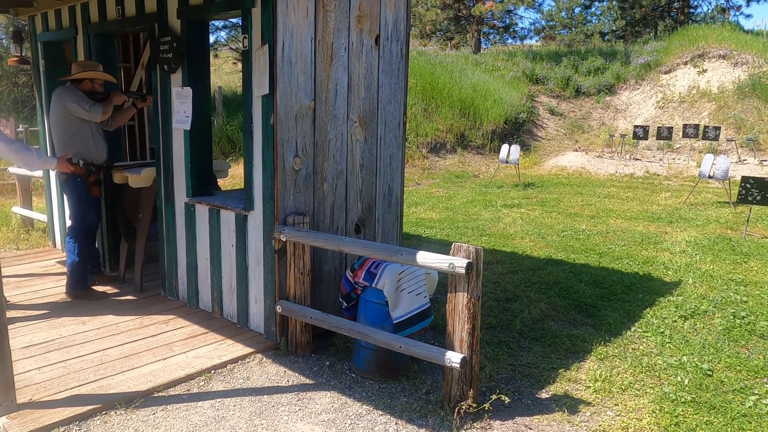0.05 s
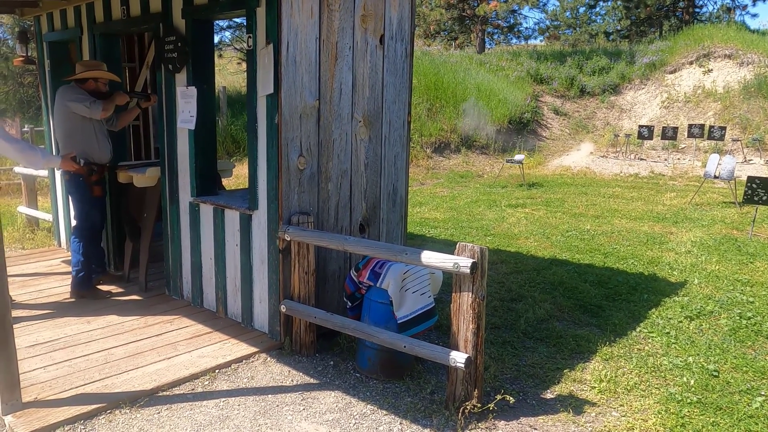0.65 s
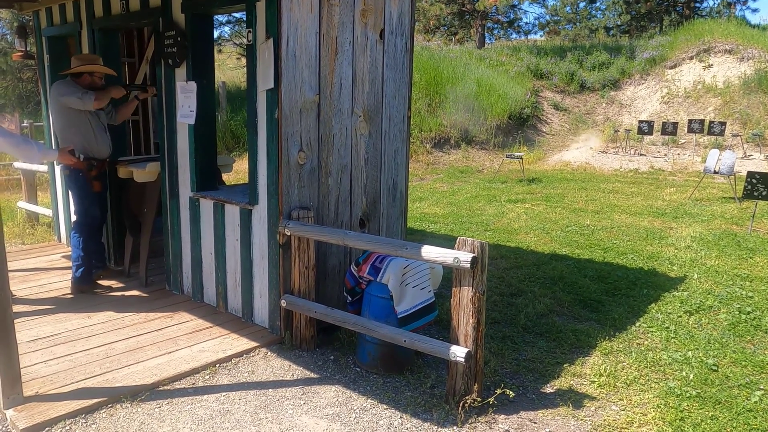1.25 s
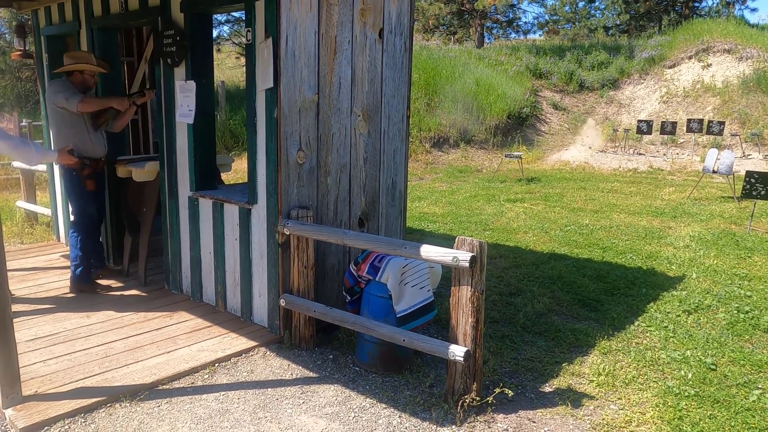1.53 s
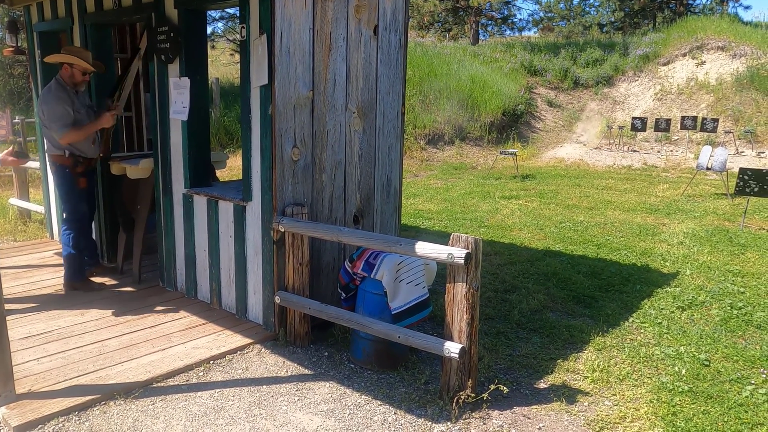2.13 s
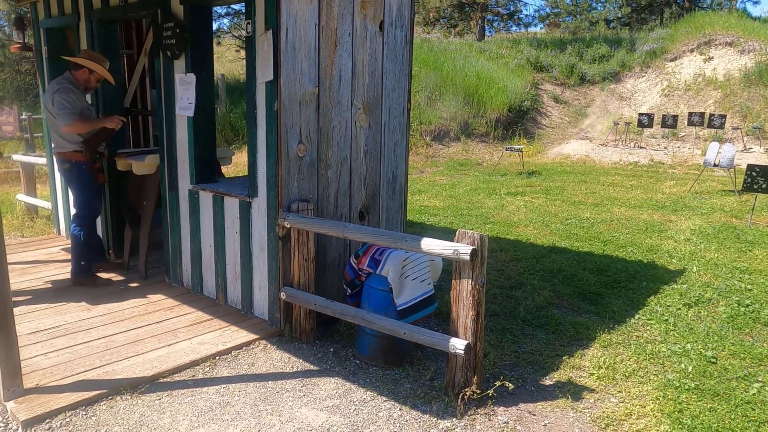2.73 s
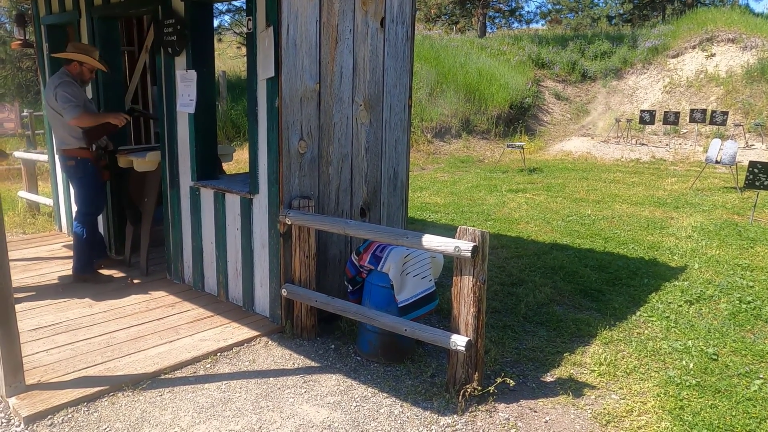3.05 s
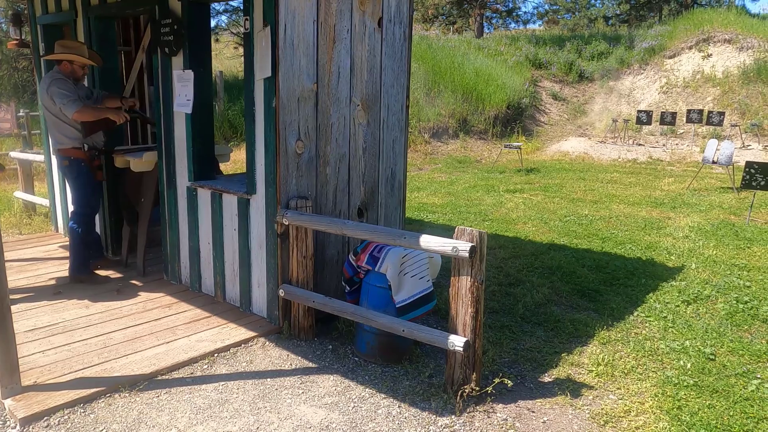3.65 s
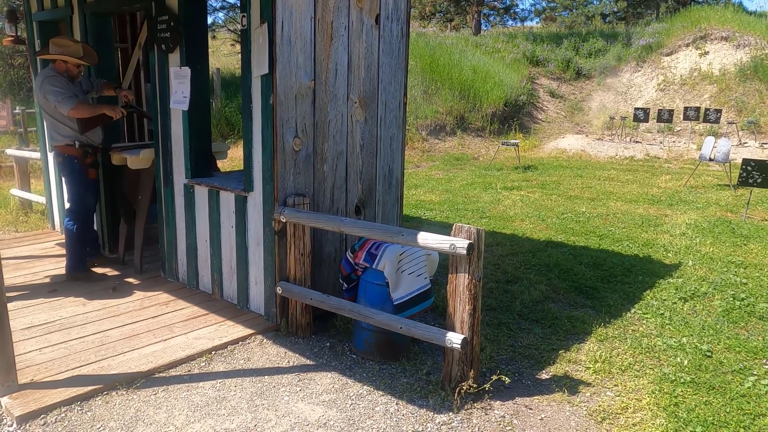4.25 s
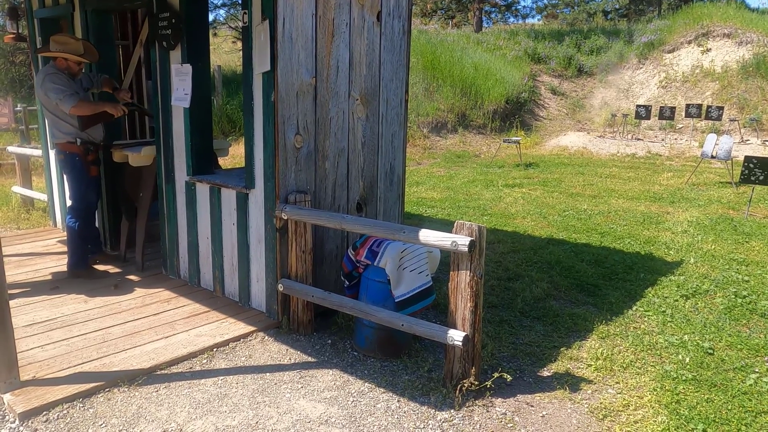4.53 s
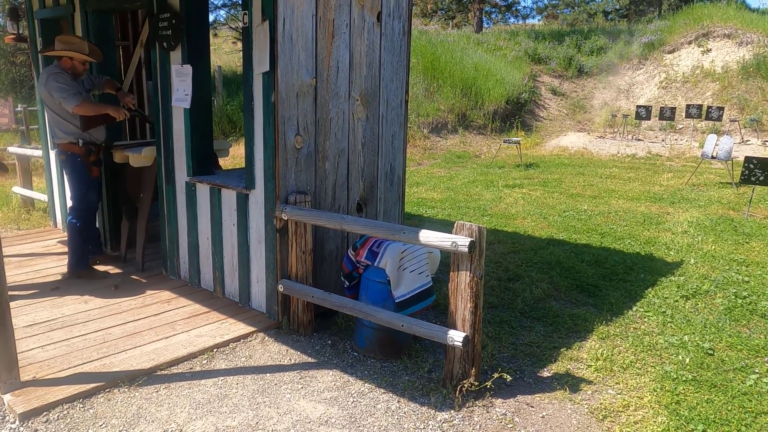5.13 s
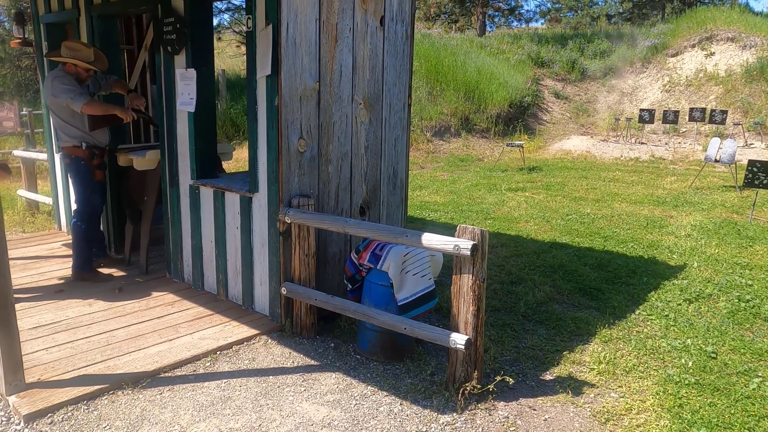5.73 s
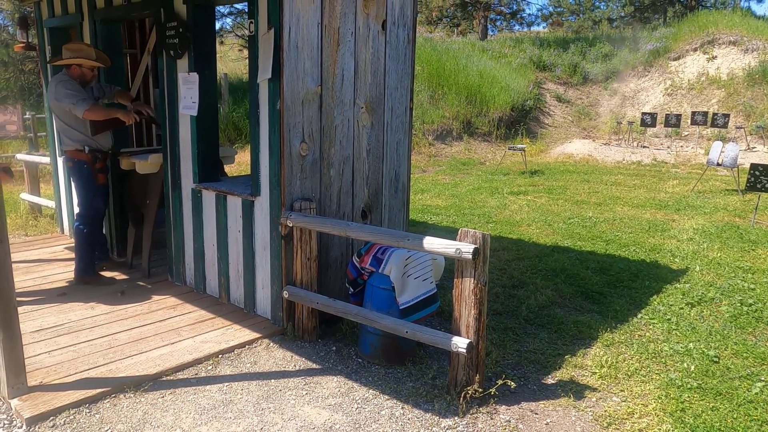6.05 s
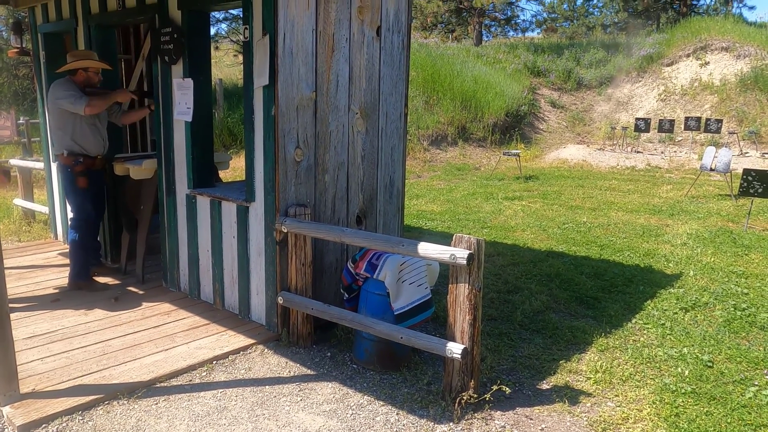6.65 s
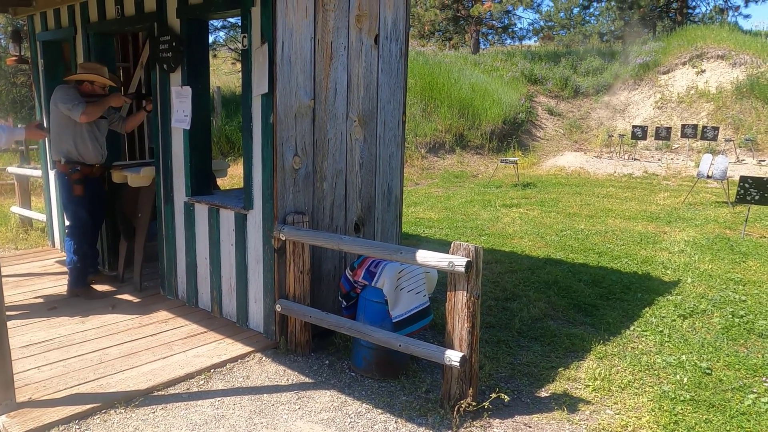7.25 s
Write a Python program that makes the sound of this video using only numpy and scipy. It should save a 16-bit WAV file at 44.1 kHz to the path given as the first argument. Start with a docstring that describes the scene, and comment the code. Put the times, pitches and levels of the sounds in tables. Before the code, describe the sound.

A shotgun fires twice from a wooden booth with a rolling echo, followed by steel clicks and wooden knocks of gun handling.

```python
"""A moment of faint hiss, then two shotgun blasts, close to the microphone in a wooden range booth.
The muzzle cracks, the booth booms, walls and the earth bank answer, and the report rolls away over
the field. The first charge slaps a steel plate, which jangles as it topples. A little to the left the
shooter works the action, lays the gun on a table and handles the next one: steel and wood knock and
slide. A bird twitters far off. The blasts overload the stereo recorder."""
import sys
import numpy as np
from scipy import signal
from scipy.fft import rfft, irfft, next_fast_len
from scipy.io import wavfile

SR = 44100
rng = np.random.default_rng(int(sys.argv[2]) if len(sys.argv) > 2 else 0)


def to_wav(s):
    """Save 16-bit WAV."""
    ch = np.atleast_2d(s).T  # columns
    pcm = np.round(np.clip(ch, -1, 1) * 32767)  # PCM
    wavfile.write(sys.argv[1], SR, pcm.astype(np.int16))


N = 321467

# the two shots: start_s, blast_db, tail_db, swell_db, swell_held_s, swell_t60_s
SHOTS = [(0.3439, 4, -0.5, -11, .013, .065), (1.3925, 2.5, -2.5, -14.5, 0.0049, 0.045)]
# contact noise of gun steel, wooden stock and table top: frequency_hz, level_db
STEEL_COLOUR = [(700, -35), (1800, -2.5), (2500, 0.5), (3300, -2.5), (4400, 3), (5500, -4.5), (6900, -3),
                (8500, -14.5), (12000, -21.5), (14500, -49)]
STOCK_COLOUR = [(250, -27), (420, -17.5), (580, -2.5), (900, -6), (1300, 2.5), (1700, -6.5), (2200, -6),
                (3200, -20.5), (7000, -54)]
TABLE_COLOUR = [(40, -24.5), (110, 5.5), (190, -1.5), (290, 2), (450, -3.5), (600, -6.5), (1000, -20),
                (3000, -49)]
# modes of the table top: pitch_hz, level_db, t60_s
TABLE_MODES = [(144.5, -12, 0.49), (286.8, -14, 0.42), (642, 0, 0.094)]


def amp(db):
    """Decibels to gain."""
    return 10 ** (np.asarray(db) / 20)


def unit(x):
    """Scales to rms 1."""
    return x / np.sqrt(np.mean(x ** 2) + 1e-20)


def curve(points, hz):
    """Joins (frequency_hz, value) points on a log-frequency axis."""
    corners_hz, values = np.transpose(points)
    return np.interp(np.log(hz + 1), np.log(corners_hz + 1), values)


def add(mix, start_s, sound):
    """Mixes in a stereo sound, or a mono one at the centre."""
    sound = np.atleast_2d(sound)
    part = mix[:, max(round(start_s * SR), 0):][:, :sound.shape[1]]
    part += sound[:, :part.shape[1]]


def clock(size):
    """Sample times in seconds."""
    return np.arange(size) / SR


def attack(t, rise_s):
    """Exponential rise from 0 toward 1."""
    return 1 - np.exp(-t / rise_s)


def fade(t, t60_s):
    """Exponential decay that loses 60 dB in t60_s."""
    return np.exp(-np.log(1000) * t / t60_s)


def noise(colour, size):
    """Stereo noise of rms 1 in the given colour, nearly mono in the bass."""
    # stereo width at the microphone: frequency_hz, side_against_mid_db
    width = [(30, -22), (100, -14), (280, -15), (500, -10.5), (2000, -9), (12000, -10.5)]
    padded = next_fast_len(size, True)
    hz = np.fft.rfftfreq(padded, 1 / SR)
    mid, side = np.exp(2j * np.pi * rng.random((2, len(hz)))) * amp(curve(colour, hz))
    side = side * amp(curve(width, hz))
    return unit(irfft([mid + side, mid - side], padded)[:, :size])


def wander(size, rate_hz):
    """Random drift of rms 1 with up to about rate_hz changes a second."""
    padded = next_fast_len(size, True)
    hz = np.fft.rfftfreq(padded, 1 / SR)
    slow = rfft(rng.standard_normal(padded)) / (1 + (hz / rate_hz) ** 4) * (hz > 0)
    return unit(irfft(slow, padded)[:size])


def ring(modes, t):
    """Damped sines of a struck body."""
    return sum(amp(db) * fade(t, t60_s) * np.sin(2 * np.pi * hz * t) for hz, db, t60_s in modes)


def background_gain(rest_db=-47, dip_db=13, deepest_after_s=0.52):
    """The background sinks after each blast and creeps back."""
    ages = [np.maximum(clock(N) - start_s, 0) / deepest_after_s for start_s, *_ in SHOTS]
    return amp(rest_db - dip_db * sum(age * np.exp(1 - age) for age in ages))


def background(drone_hz=27, buzz_hz=5400):
    """Outdoor air and high hiss, a deep wavering drone, and a thin haze of far birds and insects."""
    # open air on the range: frequency_hz, level_db
    air_colour = [(15, 2), (45, 0), (80, -13), (128, -13), (152, 2), (240, -9.5), (450, -16.5),
                  (850, -21.5), (1300, -19.5), (3300, -35), (6500, -32), (9300, -18), (11200, -26),
                  (12000, -47.5)]
    air = noise(air_colour, N)
    drone_phase = 2 * np.pi * drone_hz * clock(N) + 0.41 * wander(N, 2.6)
    drone = unit(np.sin(drone_phase) * amp(wander(N, 5)))
    buzz_colour = [(buzz_hz * .8, -50), (buzz_hz * .94, -3), (buzz_hz * 1.04, 0), (buzz_hz * 1.3, -50)]
    buzz = noise(buzz_colour, N) * amp(-21 + 3 * wander(N, 9.2))
    return (air + amp(3) * drone + buzz) * background_gain()


def bird(run_s=.14, step_s=0.028, glide=0.0094, detune=0.0152):
    """A distant bird hops between two pitches in quick runs; it sinks and rises with the background."""
    # the runs: start_s
    twitters = [.16, 2.92, 4.17, 4.77, 5.08, 5.33, 5.56, 6.27, 7.08]
    # the two notes: pitch_hz
    pitches = [5520, 5120]
    out, t = np.zeros((2, N)), clock(1200)
    fall = 1 + glide * (.5 - t / t[-1])
    for start_s in twitters:
        for k, note_s in enumerate(np.arange(start_s, start_s + run_s, step_s)):
            hz = pitches[k % 2] * (1 + detune * rng.standard_normal()) * fall
            note = np.sin(2 * np.pi * np.cumsum(hz) / SR) * np.hanning(len(t))
            add(out, note_s, rng.uniform(0.4, 1.8) * note)
    return out * amp(-16) * background_gain()


def contact(colour, modes, t60_s, booth_db, uneven_db=2.8):
    """One contact: a sharp tick, a burst of dense vibration, a few modes and the booth's reverberation."""
    t = clock(12000)
    spectrum = rfft(noise(colour, len(t)))
    # the place of contact favours some groups of modes and misses others
    ripple = wander(spectrum.shape[1], 0.0033 * SR * SR / len(t))
    vibration = unit(irfft(spectrum * amp(uneven_db * ripple)))
    tick, burst, booth = fade(t, 0.0049), fade(t, t60_s), amp(booth_db) * fade(t, 0.43)
    return vibration * (tick + burst + booth) * attack(t, 0.00087) + ring(modes, t)


def thuds():
    """Planks boom under a weight: a gun on the table or a boot on the boards."""
    # weights coming down: start_s, level_db
    landings = [(1.9102, -43.5), (2.305, -45.5), (2.346, -46), (2.6862, -23.5), (3.1047, -32.5),
                (3.193, -34.5), (3.5683, -38.5), (4.3541, -38), (6.25, -41.5)]
    plank_modes = [*TABLE_MODES, (335, 3, 0.071)]
    out = np.zeros((2, N))
    for start_s, db in landings:
        add(out, start_s, amp(db - 3) * contact(TABLE_COLOUR, plank_modes, t60_s=0.15, booth_db=-20))
    return out


def strokes(chatter_db=2, chatter_hz=180, sag_db=-8):
    """Sliding parts chatter against each other and weaken toward the end of their travel."""
    # slides of the action and of a gun on wood: start_s, length_s, steel_db, wood_db
    slides = [(0.558, 0.15, -34.5, -39), (0.71, 0.03, -32.5, -35), (0.939, 0.051, -36.5, -38.5),
              (1.005, 0.14, -43, -49.5), (1.347, .015, -44.5, -39.5), (1.735, 0.012, -40, -33),
              (2.159, 0.053, -55, -52.5), (4.338, 0.24, -56, -49.5), (6.623, 0.12, -49, -48),
              (6.676, 0.0098, -41, -25), (6.705, 0.059, -25, -19)]
    out, t = np.zeros((2, N)), clock(16384)
    for start_s, length_s, steel_db, wood_db in slides:
        sag = amp(sag_db * np.minimum(t / length_s, 1))
        stop = fade(np.maximum(t - length_s, 0), 0.079)
        parts = (steel_db, STEEL_COLOUR), (wood_db, STOCK_COLOUR), (wood_db - 20, TABLE_COLOUR)
        friction = sum(amp(db) * noise(colour, len(t)) for db, colour in parts)
        chatter = amp(chatter_db * wander(len(t), chatter_hz))
        add(out, start_s, friction * chatter * attack(t, 0.0067) * sag * stop)
    return out


def knocks(rebound_s=0.02, rebound_db=-17.5):
    """Each knock sounds the steel, the stock and the table; the part that is hit rings at its own pitch."""
    # knocks and clicks of the guns in the hands: start_s, steel_db, wood_db, pitch_hz
    hits = [(0.945, -26.5, -43, 4040), (1.912, -26, -34, 2225), (2.0852, -42, -66, 3860),
            (2.6616, -16, -19.5, 1080), (2.6852, -23.5, -13.5, 1323), (2.7983, -36, -67, 4350),
            (3.0012, -45, -74, 5560), (3.105, -44, -32, 1360), (3.195, -16, -23.5, 4330),
            (3.264, -33.5, -44, 4330), (3.2849, -65, -35.5, 926), (3.359, -41, -42, 1420),
            (3.408, -34.5, -32, 1084), (3.5682, -29, -32, 1273), (3.6245, -37, -38.5, 4360),
            (3.8735, -38.5, -38, 1490), (3.889, -31.5, -43, 3310), (3.97, -33, -51, 3210),
            (4.3543, -48, -36, 1000), (4.4003, -37.5, -52, 4390), (5.7309, -31, -39.5, 2050),
            (6.2382, -17, -37, 1477), (6.575, -40.5, -29.5, 1136), (6.6207, -32, -42, 1970),
            (6.7093, -16, -18, 1416), (6.7146, -13.5, -15, 1370), (6.733, -21, -19, 1350)]
    # modes of the gun's steel and of its wooden stock: pitch_hz, level_db, t60_s
    steel_modes = [(2490, -27, 0.29), (3150, -24, 0.15), (3740, -17, 0.11), (4180, -34, 0.049),
                   (5970, -15, 0.022)]
    stock_modes = [(1127, -11.5, 0.15), (1280, -13.5, 0.067), (1820, -42, .07)]
    out, t = np.zeros((2, N)), clock(12000)
    for start_s, steel_db, wood_db, pitch_hz in hits:
        click_db = steel_db - 5
        click = amp(click_db) * contact(STEEL_COLOUR, steel_modes, t60_s=0.04611, booth_db=-25)
        stock = amp(wood_db) * contact(STOCK_COLOUR, stock_modes, t60_s=0.053, booth_db=-23)
        table = amp(wood_db - 23) * contact(TABLE_COLOUR, TABLE_MODES, t60_s=0.106, booth_db=-23)
        struck_part = ring([(pitch_hz, max(click_db, wood_db) - 4, .075)], t)
        add(out, start_s, click + stock + table + struck_part)
        add(out, start_s + rebound_s, amp(rebound_db) * click)  # loose steel ticks again as it settles
    return out


def plate(fall_db_per_s=23, detune=0.013, uneven_db=4, rattle_db=4, rattle_hz=90):
    """Downrange, pellets slap a steel plate; each bump rings it anew and loose contact breaks the ring up."""
    # the first charge on the steel: start_s, level_db, t60_s
    pellets = (.3893, -14.5, .03)
    # bumps of the toppling plate: start_s
    bumps = [0.561, .63, 0.714, 0.948, 1.02]
    # modes of the plate, damped by what it rests on: pitch_hz, level_db, t60_s
    plate_modes = [(545, -5, 0.48), (1060, 0, 0.17), (1750, 2, 0.28), (3040, -5.5, 0.13), (3300, 2, 0.28),
                   (4530, -8.5, 0.26), (4900, 5.5, .2), (5200, -18, 0.219), (5550, -2, 0.27),
                   (7370, -2.5, .28), (7510, -4.5, 0.48)]
    out, t = np.zeros((2, N)), clock(16384)
    slap_s, slap_db, slap_t60_s = pellets
    add(out, slap_s, amp(slap_db) * noise(STEEL_COLOUR, len(t)) * fade(t, slap_t60_s))
    for start_s in bumps:
        bump_db = -42.5 - fall_db_per_s * (start_s - bumps[0])
        modes = [(hz * (1 + detune * rng.standard_normal()), db + uneven_db * rng.standard_normal(), t60_s)
                 for hz, db, t60_s in plate_modes]
        rattle = amp(rattle_db * wander(len(t), rattle_hz))
        add(out, start_s, amp(bump_db) * ring(modes, t) * attack(t, 0.0024) * rattle)
    return out


def field_roll(rise_s=0.018, lumps_db=2, lumps_hz=50):
    """The report comes back in lumps from far grass and trees, each band dying at its own rate."""
    # the rolling tail: frequency_hz, level_db
    roll_colour = [(18, -39), (30, -14), (120, -0.5), (311, -3.5), (495, -15), (827, -16.5), (941, -12),
                   (1310, -18), (1570, -20.5), (1880, -17.5), (2040, -20.5), (6310, -27), (12000, -46.5),
                   (14000, -81)]
    # how long the field holds the report: frequency_hz, t60_s
    field_decay = [(50, 1.31), (220, 0.63), (600, 1.14), (1500, 1.41), (5000, 1.14), (12000, 0.71)]
    t = clock(65536)
    scatter = rfft(noise(roll_colour, len(t)))
    hz = np.fft.rfftfreq(len(t), 1 / SR)
    out = np.zeros((2, len(t)))
    centres_hz, t60s = np.transpose(field_decay)
    for band_weights, t60_s in zip(np.eye(len(field_decay)), t60s):
        band = irfft(scatter * curve(np.c_[centres_hz, band_weights], hz))
        out += band * fade(t, t60_s) * amp(-17 + lumps_db * wander(len(t), lumps_hz))
    return out * attack(t, rise_s)


def wall_echoes(size, edge_hz=1350, floor_db=-20, t60_s=.032):
    """Walls and the earth bank throw back single echoes, all smeared and dulled alike."""
    # the reflections: delay_s, level_db
    echoes = [(.0735, -7.5), (0.0791, -7), (0.102, -16.5), (0.141, -18), (.205, -26.5), (.433, -23.5),
              (.521, -33.5)]
    # an echo before dulling: frequency_hz, level_db
    echo_colour = [(60, -10), (300, -7.5), (600, -3.5), (1000, 4.5), (2000, -7), (6000, 0), (14000, -31)]
    out, t = np.zeros((2, size)), clock(8192)
    dulled = [(hz, db + max(floor_db, -20 * np.log10(1 + (hz / edge_hz) ** 4))) for hz, db in echo_colour]
    envelope = fade(t, t60_s) * attack(t, .001) ** 2
    for delay_s, db in echoes:
        add(out, delay_s, amp(db) * noise(dulled, len(t)) * envelope)
    return out


def swell(level_db, held_s, t60_s, lumps_db=2, lumps_hz=120):
    """A brief dull rush that grows toward a blast and cuts out just ahead of it."""
    # the rush: frequency_hz, level_db
    swell_colour = [(30, -2), (150, 2), (320, -2), (430, -19), (650, -6.5), (950, -0.5), (1300, -14),
                    (2100, -16.5), (4200, -22), (6000, -31), (12000, -51)]
    ahead_s = clock(4096)[::-1]
    envelope = fade(np.maximum(ahead_s - held_s, 0), t60_s) * attack(ahead_s, 0.00042)
    gain = amp(level_db + lumps_db * wander(len(ahead_s), lumps_hz))
    return noise(swell_colour, len(ahead_s)) * envelope * gain


def muzzle_blast(planks_delay_s=0.0076):
    """Close up: the muzzle crack, its scatter off the near planks and the boom of the booth."""
    # the crack: frequency_hz, level_db
    crack_colour = [(30, -4), (130, -9), (300, -9.5), (430, -4.5), (950, 1), (1500, -7.5), (2100, -4.5),
                    (3000, -13.5), (5000, -10.5), (7000, -16.5), (10000, -28.5), (14000, -34.5)]
    # modes of the booth: pitch_hz, level_db, t60_s
    booth_modes = [(61, -21, 0.27), (162, -12, 0.08), (230, -7.5, 0.069), (263, -15.5, 0.03),
                   (312, -10, 0.11), (678, -32, 0.14), (979, -21.5, 0.19)]
    t = clock(16384)
    crack = amp(-6) * noise(crack_colour, len(t)) * fade(t, 0.036)
    scatter = amp(-15) * noise(crack_colour, len(t)) * fade(t, .09)
    add(crack, planks_delay_s, scatter)
    return crack + ring(booth_modes, t) * attack(t, 0.002)


def shotgun():
    """Both shots leave from one spot, so they share one crack and one set of echoes."""
    out, blast, tail = np.zeros((2, N)), muzzle_blast(), field_roll()
    tail += wall_echoes(tail.shape[1])
    for start_s, blast_db, tail_db, swell_db, held_s, t60_s in SHOTS:
        rush = swell(swell_db, held_s, t60_s)
        add(out, start_s - rush.shape[1] / SR, rush)
        add(out, start_s, amp(blast_db) * blast)
        add(out, start_s, amp(tail_db) * tail)
    return out


def scene(pan_db=0.62):
    """The range as heard from the booth, the shooter's hands a little left of the microphone."""
    hands = (knocks() + thuds() + strokes()) * amp([[pan_db], [-pan_db]])
    return shotgun() + plate() + hands + bird() + background()


def record(dry, left_lead_s=8e-6, edge_hz=13900):
    """The two microphone ports differ slightly, the blasts clip, and a low-pass cuts the top treble."""
    # imbalance of the ports: frequency_hz, left_minus_right_db
    port_balance = [(30, .2), (120, -.8), (280, -.4), (500, .8), (8000, .8)]
    padded = next_fast_len(N, True)
    hz = np.fft.rfftfreq(padded, 1 / SR)
    share = np.array([[.5], [-.5]])  # each port takes half the difference
    ports = amp(share * curve(port_balance, hz)) * np.exp(2j * np.pi * share * hz * left_lead_s)
    picked_up = irfft(rfft(dry, padded) * ports, padded)[:, :N]
    lowpass = signal.firwin(255, edge_hz, window=("kaiser", 8), fs=SR)
    return signal.oaconvolve(np.clip(picked_up, -1, 1), lowpass[None], "same")


dry = scene()
out = record(dry)
to_wav(out)
```